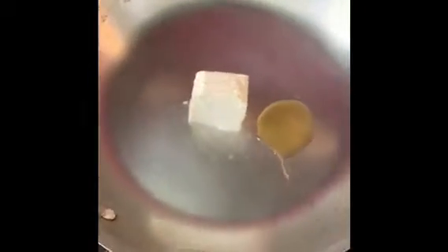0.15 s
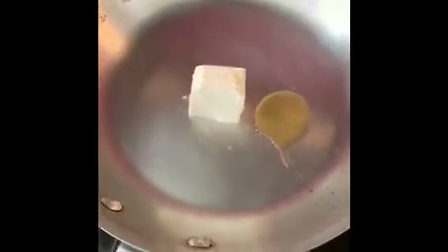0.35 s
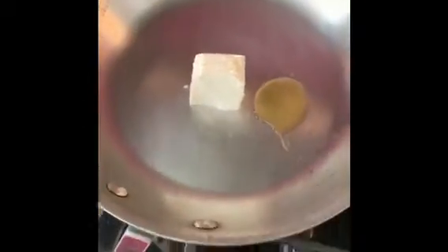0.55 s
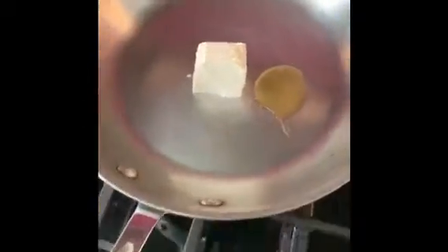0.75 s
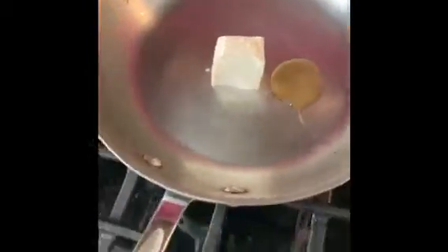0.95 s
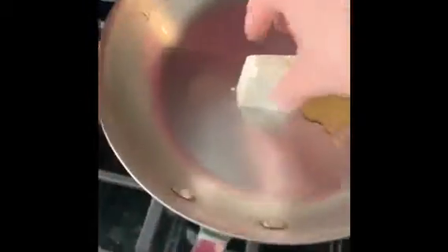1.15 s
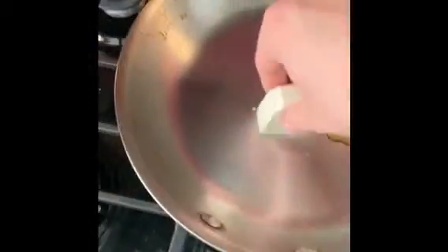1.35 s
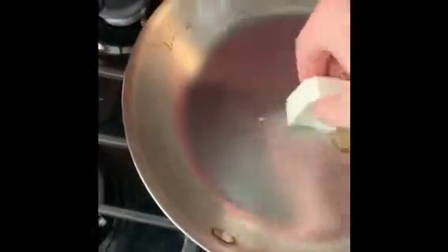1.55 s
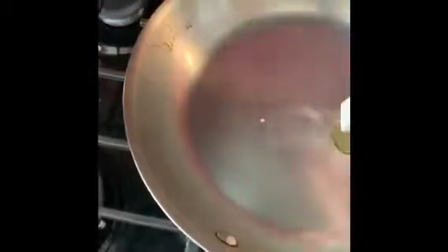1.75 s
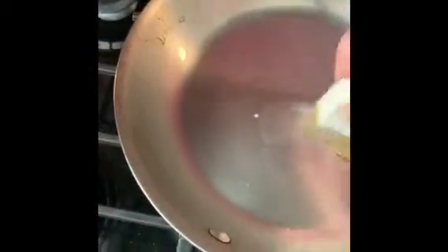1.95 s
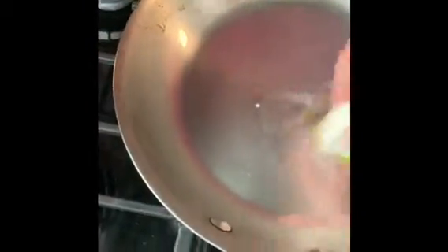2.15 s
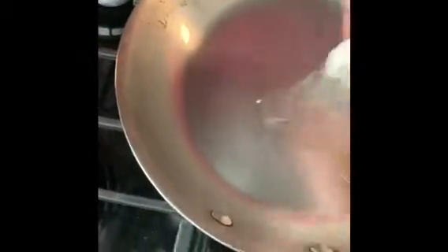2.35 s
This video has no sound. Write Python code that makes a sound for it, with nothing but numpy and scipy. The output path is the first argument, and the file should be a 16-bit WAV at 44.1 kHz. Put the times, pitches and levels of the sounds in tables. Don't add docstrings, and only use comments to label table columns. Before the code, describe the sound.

Two loud, sharp pan clanks in quick succession rattle the stove, then settle into low kitchen hum and faint gas hiss; near the end a small object clinks and bounces to rest on the left, heard in close stereo.

```python
import sys
import numpy as np
from scipy import signal
from scipy.fft import rfft, irfft
from scipy.io import wavfile
from scipy.ndimage import uniform_filter1d

SR = 44100
rng = np.random.default_rng(int(sys.argv[2]) if len(sys.argv) > 2 else 0)


def nominal_scale(level):
    x = np.asarray(level, float) / 20
    return 10 ** x


def pcm_store(signal):
    levels = np.round(np.clip(np.atleast_2d(signal), -1, 1) * 32767)
    wavfile.write(sys.argv[1], SR, levels.astype(np.int16).T)


N = 105840
TAIL = 32768
STOVE_PAN_DB = 1.5


def curve(table, hz):
    table = np.array(table, float)
    return np.interp(np.log(np.maximum(hz, 1)), np.log(table[:, 0]), table[:, 1])


def ports(a, b, pan_db):
    # f/Hz, likeness/0-1
    alike = [(100, 0.94), (500, .9), (1200, 0.39), (2500, 0.15), (5500, 0.12), (8000, 0.85), (16000, 0.9)]
    lag_s, lag_from_hz = 1 / 3750, 350
    hz = np.arange(len(a) // 2 + 1) * SR / len(a)
    likeness = np.clip(curve(alike, hz), 0, 1)
    sign = np.array([[1], [-1]])
    both = rfft(a) * np.sqrt((1 + likeness) / 2) + sign * rfft(b) * np.sqrt((1 - likeness) / 2)
    late = np.pi * lag_s * (np.hypot(hz, lag_from_hz) - lag_from_hz)
    return irfft(both * np.exp(-1j * late * (1 + sign)) * nominal_scale(sign * pan_db / 2), len(a))


def bands(count, lo=40):
    hz = np.arange(count // 2 + 1) * SR / count
    centre = lo * 2 ** (np.arange(27) / 3)
    away = 3 * np.abs(np.log2(np.maximum(hz, 1) / centre[:, None]))
    return centre, hz, np.cos(np.pi / 2 * np.clip(away, 0, 1))


def banded_noise(count, colour, env):
    noise = rfft(rng.standard_normal(count))
    return (irfft(noise * colour, count) * env).sum(axis=0)


def add(out, x, at):
    i = int(at * SR)
    fade = np.clip(np.linspace(4, -0.1, x.shape[1]), 0, 1)
    x = (x * fade)[:, :N - i]
    out[:, i:i + x.shape[1]] += x


def ring(modes, rise_s, scatter_db=2):
    t = np.arange(TAIL) / SR
    hz, db, t60_s = np.array(modes, float).T[:, :, None]
    luck = rng.standard_normal((len(modes), 1))
    tones = nominal_scale(db + scatter_db * luck) * np.sin(2 * np.pi * hz * t) * 1000 ** (-t / t60_s)
    return tones.sum(axis=0) * (1 - np.exp(-(t / rise_s) ** 2))


def crack_sound(hz):
    cycles, fall = 0.75, 0.15
    turns = np.arange(TAIL) / SR * hz
    swell = np.e * turns / cycles * np.exp(-turns / cycles)
    return swell * np.sin(2 * np.pi * np.log(1 + fall * 1.3 * turns) / fall)


def blow(colour, decays, modes, modes_db, treble_db, crack_db, crack_hz):
    rise_cycles = 0.57
    room_db, room_t60_s, room_rise_s = -10, 0.55, 0.09
    t = np.arange(TAIL) / SR
    centre, hz, weight = bands(TAIL)
    f = centre[:, None]
    env = (1 - np.exp(-t * f / rise_cycles)) * 1000 ** (-t / curve(decays, f))
    room = (1 - np.exp(-t / room_rise_s)) * 1000 ** (-t / room_t60_s * (1 + f / 6000))
    env = env + nominal_scale(room_db) * room
    tint = nominal_scale(curve(colour, hz) + treble_db * np.log2(1 + hz / 3000))
    a = banded_noise(TAIL, tint * weight, env)
    b = banded_noise(TAIL, tint * weight, env)
    scale = 0.3 / a[:SR // 20].std()
    tilted = [(m, db + treble_db * np.log2(1 + m / 3000), s) for m, db, s in modes]
    direct = nominal_scale(modes_db) * ring(tilted, 0.003) + nominal_scale(crack_db) * crack_sound(crack_hz)
    return a * scale, b * scale, direct


def walk(rate):
    k = int(SR / rate)
    steps = np.repeat(rng.standard_normal(N // k + 1), k)
    return 1.4 * uniform_filter1d(uniform_filter1d(steps, k), k)[:N]


def kitchen():
    # f/Hz, level/dB
    hum = [(15, -44), (25, -23), (77, -7.5), (123, -16), (421, -22.5), (515, -28.5), (619, -21),
           (1410, -38), (2000, -28), (2600, -47), (4400, -120)]
    # f/Hz, level/dB
    whistles = [(2970, -33), (2560, -44.5), (5150, -41.5), (7370, -52.5)]
    # f/Hz, level/dB
    hiss = [(1500, -50.5), (2700, -39), (3800, -48.5), (6500, -51), (10000, -46.5), (12500, -45),
            (15500, -45)]
    # f/Hz, level/dB
    hum_pan = [(60, -2), (110, 3), (200, -1), (380, -0.5), (700, 3.5), (1290, 1.0), (2380, 1.5),
               (4400, -0.5), (8120, -2), (15000, -1.5)]
    hum_db, whistle_width = -57, 0.04
    centre, hz, weight = bands(N, lo=32)
    low = nominal_scale(curve(hum, hz) - 20 * np.log2(1 + (hz / 2500) ** 2))
    high = nominal_scale(curve(hiss, hz))
    for f, db in whistles:
        high = high + nominal_scale(db) * np.exp(-((hz - f) / f / whistle_width) ** 2)
    flutter = np.array([3 * walk(9) / (1 + f / 500) for f in centre])
    waver = nominal_scale(0.6 * walk(1.5) + flutter)
    colour = np.hypot(low, high) * weight
    a = banded_noise(N, colour, waver)
    b = banded_noise(N, colour, waver)
    return ports(a, b, curve(hum_pan, hz)) * nominal_scale(hum_db) / a.std()


def rustles():
    # t/s, level/dB, length/s, centre f/Hz, width/Hz
    bursts = [(0.213, -38.5, .012, 960, 2700), (.6, -64, 0.96, 1950, 5900), (0.787, -69, 0.072, 3970, 8700),
              (0.909, -60, 0.09, 2470, 5170), (1.052, -59, 0.052, 1800, 2030), (0.993, -63, .2, 2590, 5270),
              (1.577, -60, 0.023, 7500, 6000), (1.913, -64.5, .012, 10000, 14040),
              (1.916, -57, 0.034, 3000, 5040), (1.962, -56, 0.17, 1000, 2200),
              (1.331, -76, 0.23, 3005, 5000)]
    out, t = np.zeros((2, N)), np.arange(TAIL // 2) / SR
    hz = np.arange(len(t) // 2 + 1) * SR / len(t)
    for at, db, length, centre, width in bursts:
        env = nominal_scale(db) * (1 - np.exp(-t / length * 8)) * np.exp(-(t / length) ** 2)
        tint = 1 / (1 + ((hz - centre) / width * 2) ** 4)
        grain = rng.standard_normal((2, len(t)))
        a, b = irfft(rfft(grain) * tint, len(t))
        add(out, ports(a * env / a.std(), b * env / a.std(), 0.36), at)
    return out


def rim_rings():
    # t/s, beating pair level/dB, other modes level/dB, pressed still after/s
    rings = [
        (0.2213, -16, -35.5, 0.035),
        (0.388, -28.5, -29, 0.039),
    ]
    # f/Hz, level/dB, t60/s
    rim = [(3410, -4, .16), (2695, -7, 0.54), (2740, -12.5, .3), (2970, -18, 0.15), (3750, -6, .15),
           (4335, -8, 0.24), (4510, -14.5, 0.15), (5136, -12.5, 0.28), (6210, -6.5, 0.13), (7620, -12, .08),
           (8100, -7.5, 0.058)]
    pair_hz, beat_hz, pair_t60_s = 3352, 19.5, 0.42
    press_db, press_s = -12.5, 0.004
    out, t = np.zeros((2, N)), np.arange(TAIL) / SR
    for at, db, rest_db, still in rings:
        pair = np.sin(2 * np.pi * pair_hz * t) * np.sin(np.pi * beat_hz * t)
        pair = pair * 1000 ** (-t / pair_t60_s) * (1 - np.exp(-(t / 0.009) ** 2))
        pair = pair * nominal_scale(db + press_db / 2 * (1.5 + np.tanh((t - still) / press_s)))
        rest = nominal_scale(rest_db) * ring(rim, 0.006)
        add(out, ports(rest, 0.5 * rest, STOVE_PAN_DB) + pair * nominal_scale([[0.7], [-0.7]]), at)
    return out


def pan_knocks():
    # t/s, peak level/dB, treble/dB, crack level/dB, crack f/Hz
    hits = [
        (0.2228, -10, -3.5, 0, 644),
        (.25, -12.5, -1.5, 5.5, 940),
        (.3615, -22, -5, 3, 732),
        (0.3679, -21.5, -15.5, 1.5, 530),
        (.391, -10, 4, 2.5, 1010),
        (0.503, -32, -0.5, 6.5, 500),
        (.685, -40, -18.5, -5, 470),
    ]
    # f/Hz, level/dB
    stove = [(29, -58), (50, -24), (223, -2), (1180, -10), (1660, -13), (7760, -44), (9870, -42),
             (11400, -47.5), (16000, -48)]
    # f/Hz, t60/s
    stove_t60 = [(60, .3), (200, 0.12), (700, 0.072), (2500, 0.072), (8000, 0.13), (16000, 0.099)]
    # f/Hz, level/dB, t60/s
    grate = [(72, -13, 0.1), (139, -1, 0.38), (183.8, -11, 0.47), (233.1, 2, 0.24), (332, -7.5, 0.45),
             (392.1, 6, 0.17), (444.4, -11, 0.27), (610, -0.2, 0.18), (900.5, 5, 0.19), (1120, -5, 0.25),
             (1520, -12.5, 0.37), (1930, 0, 0.14), (2330, -3, 0.2), (2600, -13.5, 0.18)]
    out = np.zeros((2, N))
    for at, db, treble, crack, hz in hits:
        a, b, direct = blow(stove, stove_t60, grate, -10.5, treble, crack, hz)
        sound = ports(a + 0.35 * direct, b, STOVE_PAN_DB) + 0.5 * direct * nominal_scale([[0.7], [-0.7]])
        add(out, nominal_scale(db) * sound, at)
    return out


def clink():
    # f/Hz, level/dB, t60/s
    clink_modes = [(958, 4, .1), (1800, -8, .07), (2665, -4, .14), (3854, -5, .2), (4050, -8, .1)]
    out = np.zeros((2, N))
    tone = nominal_scale(-48) * ring(clink_modes, 0.0015, scatter_db=0.5)
    add(out, ports(0.92 * tone, 0.74 * tone, 0), 1.917)
    return out


def small_taps():
    # t/s, peak level/dB, treble/dB, crack level/dB, crack f/Hz
    taps = [
        (1.949, -39.5, 10, 1, 1220),
        (1.992, -39, -4, -23, 960),
        (2.052, -46, -5.5, -2, 1060),
        (2.11, -47, -30, -2, 910),
        (2.174, -57.5, -32, -7, 900),
    ]
    # f/Hz, level/dB
    tap_colour = [(120, -6), (200, -30), (313, -3.5), (529, -23), (778, 3), (1460, -1.5), (2360, -18.5),
                  (8000, -64), (10400, -77), (17600, -120)]
    # f/Hz, t60/s
    tap_t60 = [(200, 0.6), (1000, 0.04), (8000, 0.24)]
    # f/Hz, level/dB, t60/s
    tap_modes = [(744, -5, 0.14), (1462, -6.5, 0.099), (1800, 0, 0.088)]
    out = np.zeros((2, N))
    for at, db, treble, crack, hz in taps:
        a, b, direct = blow(tap_colour, tap_t60, tap_modes, -21, treble, crack, hz)
        add(out, nominal_scale(db) * ports(a + direct, b, 5), at)
    return out


def scene():
    return kitchen() + rustles() + rim_rings() + pan_knocks() + clink() + small_taps()


def roll_off(x):
    return signal.sosfilt(signal.butter(12, 16470, fs=SR, output="sos"), x)


def record(dry):
    top_hz = 15850
    hz = np.arange(N // 2 + 1) * SR / N
    mix = irfft(rfft(dry) / (1 + (hz / top_hz) ** 200), N)
    return roll_off(mix)


dry = scene()
out = record(dry)
pcm_store(out)
```